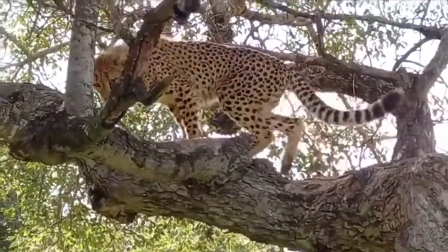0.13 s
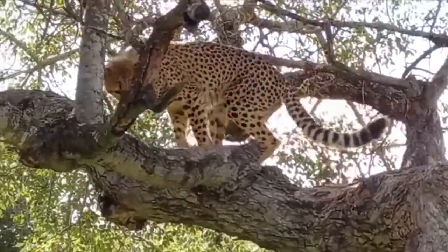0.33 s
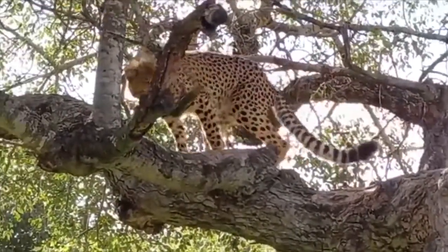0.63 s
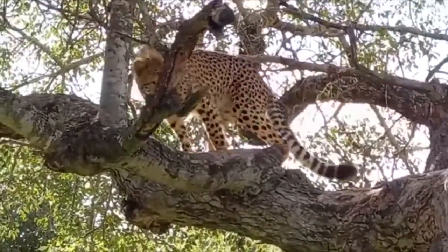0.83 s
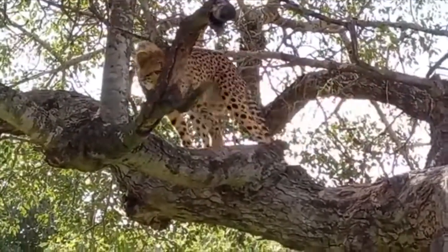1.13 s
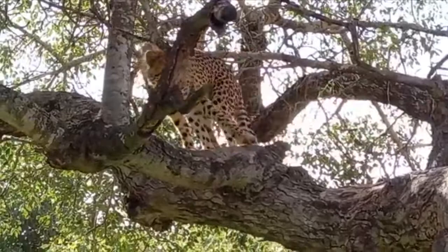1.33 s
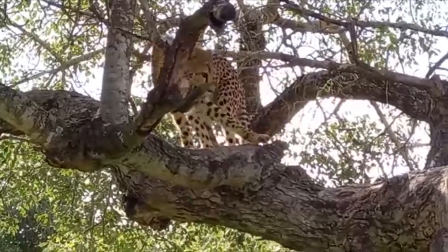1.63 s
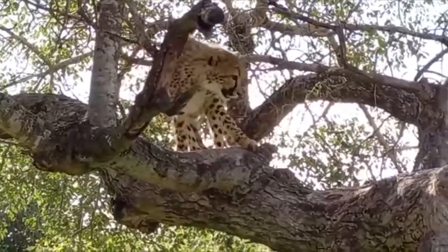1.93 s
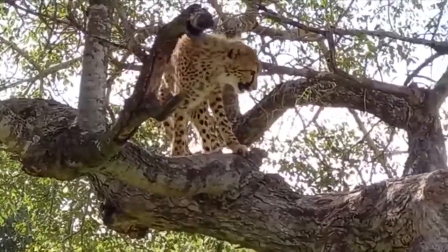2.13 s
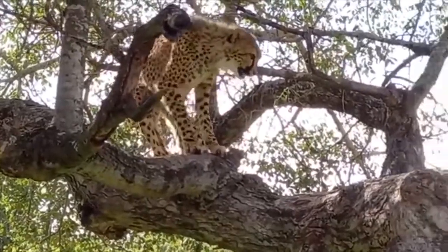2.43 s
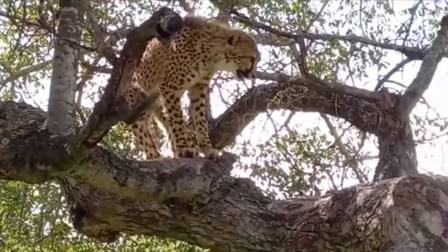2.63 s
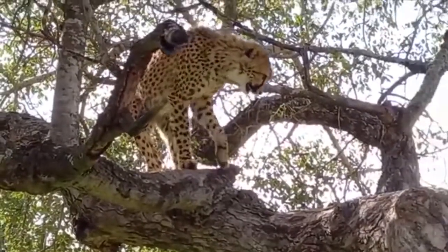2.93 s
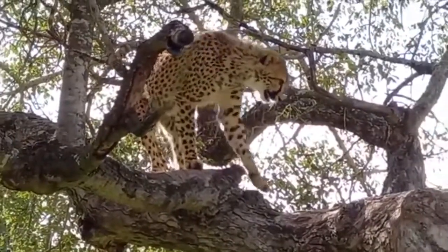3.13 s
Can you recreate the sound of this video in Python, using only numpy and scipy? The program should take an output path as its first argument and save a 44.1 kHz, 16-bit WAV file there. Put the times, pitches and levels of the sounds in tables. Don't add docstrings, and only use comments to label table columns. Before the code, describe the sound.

A larger bird gives one short falling whistle late on, then a soft low note, echoing among trees; before it, a small bird twitters rapidly over a close low idling rumble, faint insects and microphone hiss.

```python
import sys
import numpy as np
from scipy import signal
from scipy.io import wavfile

SR = 44100
rng = np.random.default_rng(int(sys.argv[2]) if len(sys.argv) > 2 else 0)


def volts(x):
    e = np.asarray(x, float) / 20
    return 10 ** e


def bounce(signal):
    frames = np.transpose(np.atleast_2d(signal))
    limited = np.clip(frames, -1, 1)
    pcm = np.round(limited * 32767).astype(np.int16)
    wavfile.write(sys.argv[1], SR, pcm)


N = 144207


def rms_one(x):
    return x / np.sqrt(np.mean(x ** 2) + 1e-20)


def seconds():
    return np.arange(N) / SR


def in_time(rows):
    s, *columns = np.transpose(rows)
    return [np.interp(seconds(), s, column) for column in columns]


def at_hz(points, hz):
    table = np.array(points)
    return np.interp(np.log(hz), np.log(table[:, 0]), table[:, 1])


def filtered(x, order, hz, kind):
    return signal.sosfilt(signal.butter(order, hz, kind, fs=SR, output="sos"), x)


def drift(rate):
    pole = np.exp(-80 * np.pi * rate / SR)
    white = rng.standard_normal(N // 40 + 2002)
    slow = signal.lfilter([1], [1, -2 * pole, pole * pole], white)[2000:]
    return np.interp(np.arange(N) / 40, np.arange(len(slow)), rms_one(slow))


def sine(hz, start=None):
    if start is None:
        start = rng.uniform(0, 2 * np.pi)
    return np.sqrt(2) * np.cos(2 * np.pi * np.cumsum(hz) / SR + start)


def place(x, pan_db, lag_s):
    n = np.arange(N)
    left = np.interp(n - lag_s * SR, n, x)
    return np.array([left * volts(pan_db / 2), x * volts(-pan_db / 2)])


def wood(x, wet_db, t60, from_hz, echoes=()):
    t = np.arange(SR) / SR
    tail = rng.standard_normal((2, SR)) * volts(-60 * t / t60) * np.minimum(t / 0.0011, 1)
    tail = volts(wet_db) * tail / np.sqrt(np.sum(tail ** 2, axis=1, keepdims=True))
    for delay_s, left_db, right_db in echoes:
        tail[:, int(delay_s * SR)] += volts(np.array([left_db, right_db]))
    tail = filtered(tail, 5, from_hz, "high")
    return x + signal.fftconvolve(x, tail, axes=1)[:, :N]


# start_s, pitch_hz (three times the crank cycle rate), level_db (of the main order)
IDLE = [(0.0, 47.05, -30.5), (0.21, 46.58, -28.5), (0.38, 46.47, -30.5), (0.45, 46.25, -29.5),
        (0.75, 45, -27), (0.82, 45.92, -28.5), (1.11, 46.2, -30.5), (1.19, 46.1, -27.5),
        (1.4, 47.12, -34.5), (1.5, 46.76, -28), (1.7, 46.76, -30.5), (2.43, 46.68, -31), (2.48, 46.5, -26),
        (2.56, 45.3, -31.5), (2.81, 46.29, -28), (3.05, 46.24, -32.5), (3.14, 46.92, -27.5),
        (3.27, 45.4, -34.5)]
# multiple_of_cycle_rate, level_db (under the main order), unsteadiness_db
ENGINE_ORDERS = [(2.98, -26.5, -0.5), (4, -33.5, 12), (5.05, -40.5, 6), (6.008, -1, 0.68),
                 (6.91, -24, -2.5), (8.86, -17, 1), (10.806, -24.5, 5), (12.014, -22, 4.5),
                 (12.99, -27, 4.5), (14.97, -20, 1.5), (15.96, -36, 2.5), (17.98, -33.5, 4.5),
                 (21.03, -59.5, 10), (67.5, -45.5, -4)]


def engine():
    hz, effort_db = in_time(IDLE)
    out = np.zeros(N)
    for multiple, db, sway_db in ENGINE_ORDERS:
        order = round(multiple)
        is_main = order == 6
        follow_db = effort_db if is_main else effort_db.mean()
        gain = volts(db + sway_db * drift(6) + follow_db)
        out += gain * sine(hz * order / 3, 0 if is_main else None)
    return out


# frequency_hz, likeness (0 to 1)
LIKENESS = [(60, 0.67), (290, 0.37), (640, 0), (3000, 0), (15000, 0.017)]
# frequency_hz, left_minus_right_db
LEAN = [(60, -6.5), (200, 4.5), (400, -5.5), (700, 3.5), (2400, -1), (8000, -2), (15000, 1)]


def banded_noise(spectrum, low_hz, count, patchy_db):
    out = 0
    edges = low_hz * 2 ** (np.arange(count + 1) / 2)
    white = rng.standard_normal((2, 2, N + SR // 2))
    for k, (low, high) in enumerate(zip(edges, edges[1:])):
        mid, side = filtered(white[k % 2], 2, [low, high], "band")[:, -N:]
        hz = np.sqrt(low * high)
        alike = np.clip(at_hz(LIKENESS, hz), -1, 1)
        lean = at_hz(LEAN, hz) / 2
        gain = volts(at_hz(spectrum, hz) + patchy_db * drift(2.7)) * volts(np.array([[lean], [-lean]]))
        out = out + gain * (np.sqrt(1 + alike) * mid + np.sqrt(1 - alike) * side * [[1], [-1]])
    return rms_one(out)


# frequency_hz, density_db (per Hz)
RUMBLE = [(15, -57), (25, -19), (37, -53), (65, 0), (97, 1.5), (141, -6.5), (233, -13.5), (325, -22.5),
          (700, -53.5), (910, -83), (1540, -120)]
# frequency_hz, density_db (per Hz)
AIR = [(500, 1.5), (1300, -1), (2600, -3), (4000, -10.5), (7000, -9.5), (8400, -28), (13000, -3.5),
       (15500, -9)]


def noise_floor():
    rumble = volts(-44) * banded_noise(RUMBLE, low_hz=24.2, count=9, patchy_db=1.4)
    air = volts(-61) * banded_noise(AIR, low_hz=540.5, count=10, patchy_db=.25)
    return rumble + air


def cricket():
    chirp_every_s, pulse_every_s, pulse_s = .3175, .041, .027
    in_chirp_s = seconds() % chirp_every_s
    in_pulse_s = in_chirp_s % pulse_every_s
    pulse = np.sin(np.pi * np.clip(in_pulse_s / pulse_s, 0, 1)) ** .6
    gate = (in_chirp_s // pulse_every_s < 4) * pulse
    return volts(-72 + 2 * drift(9)) * gate * sine(7400 * (1 + .012 * drift(150)))


# start_s, level_db
BUZZ = [(0.0, -70), (0.03, -69.5), (0.7, -72), (0.86, -75), (0.96, -69.5), (1.41, -73), (1.56, -83),
        (1.61, -66), (1.85, -79), (1.89, -70.5), (2.49, -74), (2.66, -64.5), (2.85, -78), (2.91, -60.5),
        (3.22, -74), (3.27, -84)]


def buzz():
    centre_hz, width_hz, clicks_per_s = 7250, 1000, 3000
    clicks = (rng.random(N) < clicks_per_s / SR) * rng.standard_normal(N)
    swell_db = in_time(BUZZ)[0] + 4 * drift(25)
    ring = filtered(clicks, 2, [centre_hz - width_hz / 2, centre_hz + width_hz / 2], "band")
    return volts(-3 + swell_db) * rms_one(ring)


# crest_s, crest_pitch_hz, lead_in_db, dip_db, crest_db
SYLLABLES = [(0.01, 6010, -58, -48, -47), (0.087, 6070, -60, -56, -47.5), (0.166, 5860, -57, -55, -51),
             (0.244, 5640, -61, -55.5, -57), (0.319, 5620, -60, -60, -55.5), (0.394, 5600, -57, -55, -51),
             (0.472, 5850, -54, -48, -44.5), (0.549, 5750, -54, -43.5, -48),
             (0.628, 5463, -52.5, -50, -43.5), (0.711, 5475, -52, -54, -50), (0.789, 5510, -54, -61, -51),
             (0.872, 5120, -55.5, -57, -55), (0.95, 5390, -53.5, -55, -51.5), (1.036, 5700, -56, -52, -46),
             (1.114, 5605, -67, -48, -46), (1.2, 5727, -55.5, -50.5, -44), (1.279, 5585, -60, -46.5, -48.5),
             (1.372, 5770, -54, -58, -44), (1.459, 5450, -60, -60, -82), (1.516, 5650, -55.5, -52, -41),
             (1.6, 5770, -48, -49, -45.5), (1.698, 5730, -58, -53, -45), (1.788, 5496, -64, -54, -54),
             (1.882, 5180, -60.5, -61, -57), (1.974, 5600, -70, -54, -58.5), (2.065, 5430, -56, -55, -72),
             (2.147, 5675, -62, -60, -64), (2.238, 5436, -73, -58, -47.5), (2.327, 5477, -69, -54, -53.5),
             (2.422, 5480, -61, -63, -54), (2.55, 5120.0, -70, -60, -81), (2.801, 4794, -72, -63, -93),
             (2.918, 5074, -68, -69, -57.5), (3.039, 4930.0, -68, -70, -61), (3.141, 5100.0, -66, -65, -54),
             (3.241, 5430.0, -61, -70, -48.5)]
# start_s, top_pitch_hz, dip_pitch_hz, lead_up_stretch (ratio)
VOICE_REACH = [(0, 6830, 5660, 0.81), (.3, 6800, 5300, 0.92), (.55, 6870, 5430, 1.11),
               (.79, 6520, 5280, 0.89), (.87, 6140, 5045, 0.93), (1.03, 6080, 5260, 0.99),
               (1.2, 6400, 5317, 1.1), (1.28, 6000, 5560, 1.06), (1.37, 6180, 5130, 1),
               (1.51, 5720, 5160, 1.07), (1.6, 5780, 5398, 0.92), (1.79, 5700, 5040, 1.14),
               (1.97, 5620, 5104, 1.1), (2.06, 5675, 5280, 1.02), (2.24, 5410, 5350, 1.2),
               (2.331, 5430, 5050, 0.95), (2.8, 5060, 4680, 1.3), (3.24, 5225, 4878, 1.22)]
SYLLABLE_S = [-.045, -.040, -.034, -.024, -.015, -.010, -.004, .004, .010]
FIRST_PATTERN_DB = [-25, -12, -12, 0, -1, -14, -3, -4, -25]


def twitter():
    t = seconds()
    out = np.zeros(N)
    wobble = 1 + .011 * drift(117)
    breath = rms_one(filtered(rng.standard_normal(N), 4, 550, "low"))
    rasp = 1 + .35 * drift(210) + .22 * breath
    reach_s, *reach = np.transpose(VOICE_REACH)
    for s, crest, lead_db, dip_db, crest_db in SYLLABLES:
        top, dip, stretch = (np.interp(s, reach_s, column) for column in reach)
        at = np.where(np.array(SYLLABLE_S) < 0, stretch, 1) * SYLLABLE_S
        span = (t > s + at[0]) & (t < s + at[-1])
        since_crest = t[span] - s
        pitches = [.98 * top, top, .97 * top, dip, dip, (dip + crest) / 2, crest, crest, .97 * crest]
        catch_db = (dip_db + crest_db) / 2 - 7
        levels = [lead_db - 24, lead_db, lead_db - 0.5, dip_db - 4.5, dip_db,
                  catch_db, crest_db, crest_db - 1.0, crest_db - 27]
        hz = np.interp(since_crest, at, pitches)
        db = np.interp(since_crest, at, levels)
        first_db = np.interp(since_crest, at, FIRST_PATTERN_DB + 2 * rng.standard_normal(len(at)))
        turn = np.pi * np.cumsum(hz * wobble[span]) / SR
        out[span] += volts(db - 1.2) * rasp[span] * np.sin(2 * turn)
        out[span] += volts(-62 + 0.22 * (db + 52.0) + first_db) * np.sin(turn)
    return out


# delay_s, left_db, right_db
BUSH_ECHOES = [
    (.023, -10, -10),
]


def bird_in_bush():
    voice = place(twitter(), -8, 0.0003534)
    return wood(voice, wet_db=-6, t60=.17, from_hz=1960, echoes=BUSH_ECHOES)


# start_s, level_db, decay_s, top_hz
SNAPS = [
    (0.506, -52, .004, 3500),
    (1.4228, -42, .0007, 2500),
]


def snaps():
    out, t = np.zeros(N), seconds()
    for s, db, decay_s, top_hz in SNAPS:
        burst = volts(db) * rng.standard_normal(N) * (t > s) * np.exp(-np.abs(t - s) / decay_s)
        out += filtered(burst + 1e-18, 2, [600, top_hz], "band")
    return out


def whistle(rows, lag_s):
    hz, db, pan_db = in_time(rows)
    t = seconds()
    sounding = (t > rows[0][0]) * (t < rows[-1][0])
    flutter = 1 + 0.061 * sine(189.6 + 25 * drift(17.6))
    return place(sine(hz) * volts(db) * sounding * flutter, pan_db, lag_s)


# start_s, pitch_hz, level_db, left_minus_right_db
FALL = [
    (2.350, 1430, -66, -9),
    (2.366, 1418, -36, -9),
    (2.415, 1456, -33, -8.5),
    (2.435, 1460, -39.5, -12),
    (2.465, 1495, -29.5, 0.5),
    (2.506, 1487, -27.5, -6),
    (2.525, 1374, -26.5, -0.5),
    (2.57, 973, -36.5, -1),
    (2.586, 925, -65, -10),
]
# delay_s, left_db, right_db
TRUNK_ECHOES = [
    (0.051, -21, -22),
    (.11, -16.5, -31),
]


def falling_call():
    return wood(whistle(FALL, 0.000294), wet_db=-5.5, t60=0.57, from_hz=1470, echoes=TRUNK_ECHOES)


# start_s, pitch_hz, level_db, left_minus_right_db
LOW_NOTE = [
    (2.615, 762, -65, -6.5),
    (2.632, 761, -48.5, -3),
    (2.656, 781, -43.5, -6),
    (2.69, 774, -44, -6.5),
    (2.715, 770, -70, -6.5),
]


def low_note():
    return wood(whistle(LOW_NOTE, .0001), wet_db=-8, t60=0.27, from_hz=460)


def scene():
    motor = place(engine(), -6.5, .00036)
    insects = place(cricket(), 0, 0) + place(buzz(), -6, 0.000436)
    birds = bird_in_bush() + falling_call() + low_note()
    return motor + noise_floor() + insects + birds + snaps()


def band_limit(x):
    return signal.sosfilt(signal.butter(12, 15760, fs=SR, output="sos"), x)


def record(dry):
    droop = filtered(dry, 3, 15500, "low")
    finished = signal.sosfilt(signal.ellip(10, .5, 70, 15700, fs=SR, output="sos"), droop)
    return band_limit(finished)


dry = scene()
out = record(dry)
bounce(out)
```